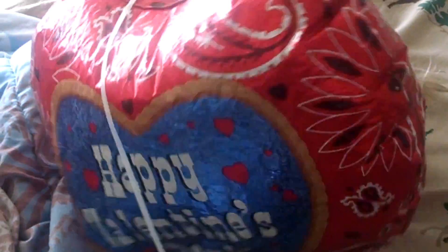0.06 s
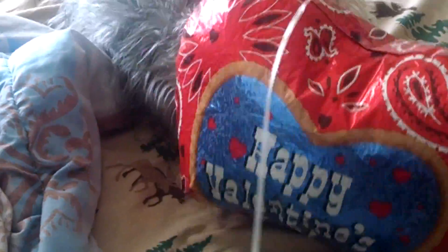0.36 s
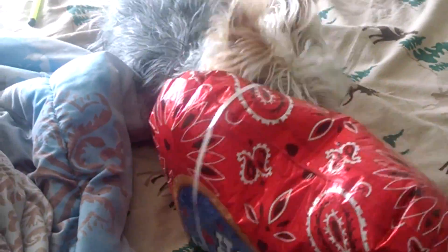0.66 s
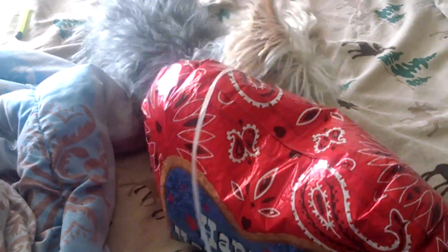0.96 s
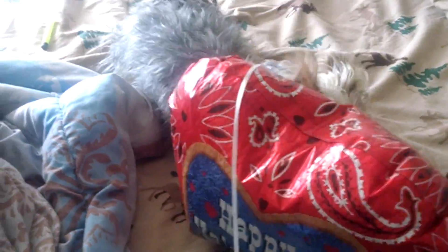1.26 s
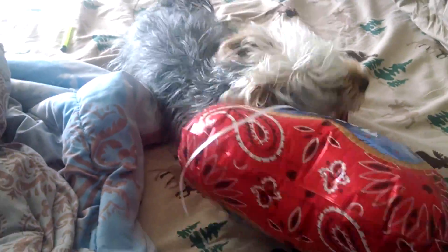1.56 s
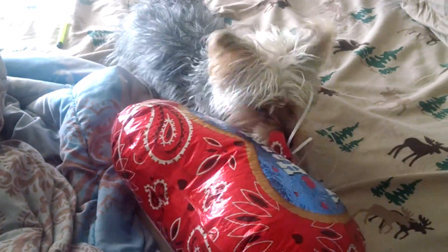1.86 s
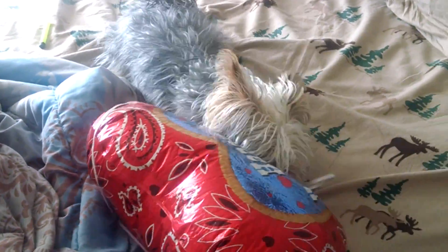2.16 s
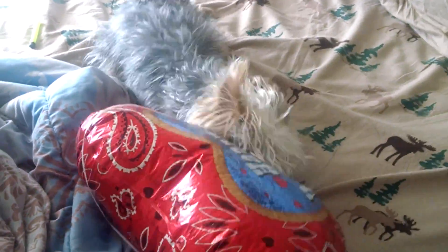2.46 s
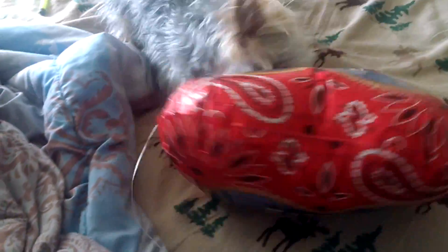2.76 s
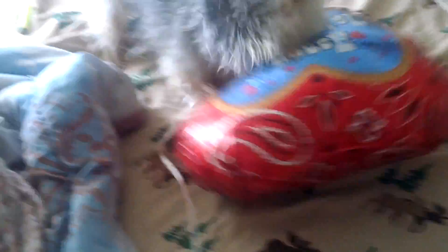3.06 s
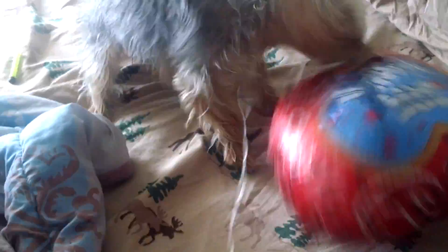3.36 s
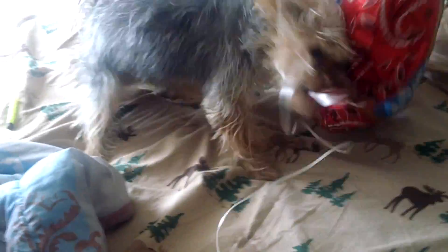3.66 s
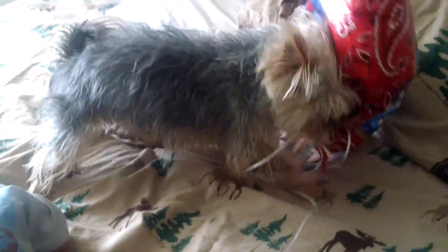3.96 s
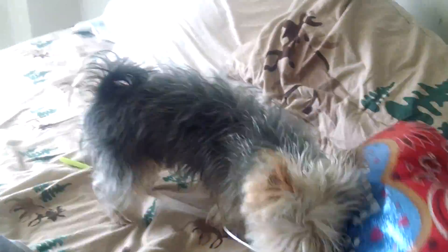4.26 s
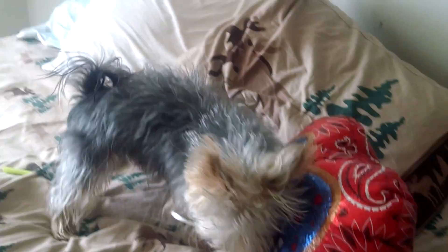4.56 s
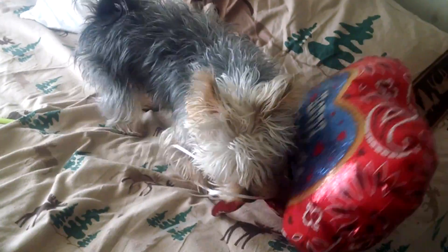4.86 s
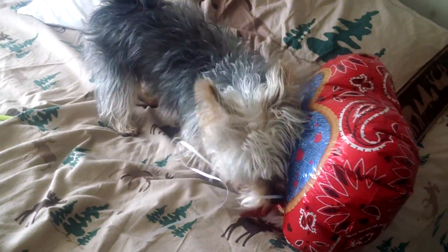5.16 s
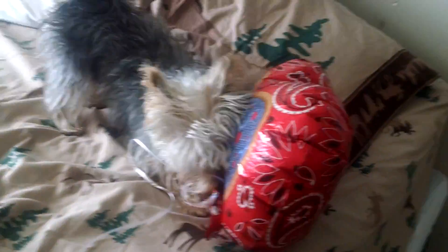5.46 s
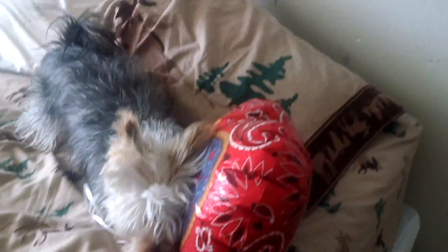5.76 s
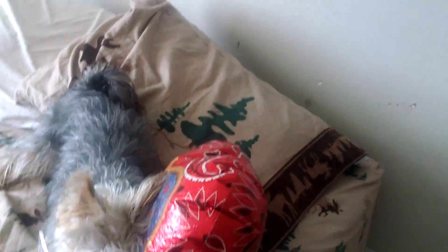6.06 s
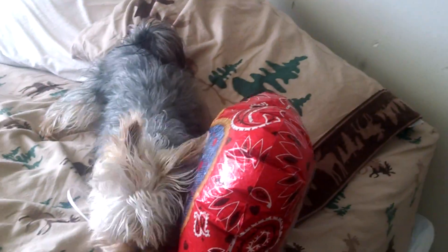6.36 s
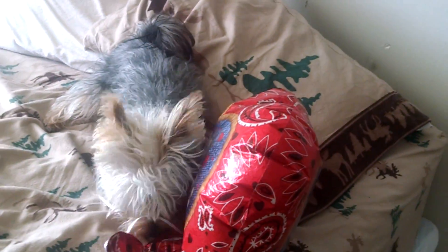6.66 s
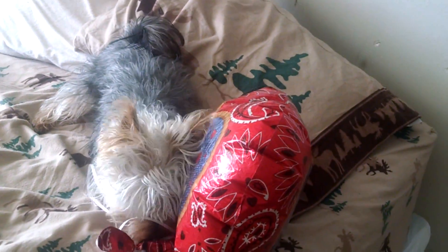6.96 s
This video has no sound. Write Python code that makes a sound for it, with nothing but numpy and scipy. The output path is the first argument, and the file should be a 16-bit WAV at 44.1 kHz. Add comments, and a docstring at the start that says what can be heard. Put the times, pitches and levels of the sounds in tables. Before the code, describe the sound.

A small dog bites and paws at a foil balloon on a bed, making bright, dense bursts of crinkling with sharp single cracks. The skin rubs on fur and bedding and booms softly inside. About halfway, hollow knocks, soft paw thuds and a brief squeak come, then the crinkling turns lighter, with a few more knocks near the end. The stereo microphone is close, in a faintly humming bedroom.

```python
"""A bedroom with a faint hum, the stereo microphone close above the bed.
A small dog bites and paws at a foil balloon: creases snap in dense swarms, the skin rubs on fur
and bedding with a brief squeak or two, and the gas inside booms softly.
Now and then a single crease cracks, the balloon takes a hollow knock or a paw thuds on the mattress."""
import sys
import numpy as np
from scipy import signal
from scipy.fft import rfft, irfft, next_fast_len
from scipy.io import wavfile

SR = 44100
rng = np.random.default_rng(int(sys.argv[2]) if len(sys.argv) > 2 else 0)


def to_wav(s):
    """Save 16-bit WAV."""
    ch = np.atleast_2d(s).T  # columns
    pcm = np.round(np.clip(ch, -1, 1) * 32767)  # PCM
    wavfile.write(sys.argv[1], SR, pcm.astype(np.int16))


N = 313110
TIME = np.arange(N) / SR

# Levels are relative within each table.
# spectra of the room tone, rubbed skin, booming gas, knocks, cracks and foil: frequency_hz, level_db
ROOM_COLOUR = [(50, -22), (100, -3), (300, -2), (1000, -17), (4000, -38)]
SKIN_COLOUR = [(150, -7.5), (400, 1), (700, 3.5), (1100, -5), (1800, -5.5), (2600, -4.5), (4500, -10.5),
               (9000, -22.5), (15000, -46)]
GAS_COLOUR = [(25, -17), (60, 1), (110, -7), (180, -2), (400, -7.5), (700, -17.5), (1500, -13), (7000, -28)]
KNOCK_COLOUR = [(40, -12), (140, -5), (240, 13.5), (400, 6.5), (900, 7.5), (2000, 7.5), (5000, 4),
                (15000, -31)]
CRACK_COLOUR = [(2000, -24), (7000, -9.5), (10000, -2), (14000, 1), (16000, -14)]
FOIL_COLOUR = [(400, -10.5), (1500, -10), (2500, -9.5), (4000, -5), (7000, -6.5), (10000, -1), (14000, 2.5),
               (15300, -4), (16000, -40)]
# swell of the deepest room hum: time_s, level_db
DEEP_HUM_SWELL = [(3.8, -63.5), (4.7, -53), (4.97, -47), (5.15, -58)]
# fainter tones in the room: pitch_hz, level_db
FAINT_HUMS = [(75, -61), (151, -67)]
# paws landing on the mattress: start_s, level_db, pitch_hz
PAW_STEPS = [(3.192, -22, 113), (3.319, -24.5, 120), (3.49, -22, 107)]
# resonances of the gas-filled skin: pitch_hz, width_hz, level_db
BALLOON_MODES = [(151.9, 8.9, 2.5), (202.1, 8.1, 2.5), (252, 38, -2), (301, 20, 1), (360.5, 20, 1),
                 (458.6, 80, 2), (594, 87, -2.5), (730, 64, -0.5)]
# the balloon pushed about: time_s, gas_db, skin_db
PUSHES = [(0, -29.5, -38), (0.2, -27.5, -34), (0.45, -37, -72), (0.8, -38.5, -50), (1.21, -32.5, -41.5),
          (1.55, -29.5, -66), (1.75, -39, -33.5), (1.95, -32.5, -42.5), (2.7, -31.5, -36),
          (3.25, -40.5, -32.5), (3.58, -34, -28), (3.78, -46.5, -42.5), (4.1, -43, -51), (4.4, -39, -46),
          (5.3, -31, -34.5), (6.2, -28, -36.5), (6.45, -37, -43.5), (6.93, -30.5, -40)]
# brief squeaks of the skin: centre_s, length_s, pitch_hz, level_db
SQUEAKS = [(0.324, 0.059, 590, -30), (0.62, 0.065, 890, -44), (3.556, 0.061, 612, -33)]
# knocks on the balloon: start_s, shudder_db, decay_s, dull_above_hz, boom_db, boom_hz
KNOCKS = [ (3.3238, -17.5, .04, 6000, -6.5, 600), (3.3345, -28.5, .2, 1500, -21, 620),
          (3.4014, -24, .05, 1800, -9.5, 296), (3.490, -23, 0.07, 2500, -19, 594),
          (5.4772, -23.5, 0.04, 3000, -14, 400), (5.4805, -26.5, 0.5, 2200, -29, 765),
          (6.1652, -17, .2, 1300, -11.5, 243), (6.1816, -19.5, .22, 1100, -13.5, 243),
          (6.2146, -24, .62, 900, -20, 243), ]
# single creases cracking: start_s, level_db
CRACKS = [(0.2437, -17), (0.2617, -12), (0.5483, -12.5), (1.6798, -16), (2.0805, -14), (2.4235, -15),
          (3.3265, -12), (3.5967, -14), (4.1803, -28), (4.2628, -26), (4.2824, -27), (4.7983, -31.5),
          (4.9683, -20), (5.229, -22), (5.4788, -17), (5.8773, -20.5), (6.0154, -21), (6.1748, -20),
          (6.2714, -14.5), (6.3131, -22), (6.3522, -11), (6.4006, -24), (6.456, -33), (6.5622, -27),
          (6.5797, -29), (6.764, -30.5), (6.7891, -30.5), (6.8175, -31), (6.9002, -28), (6.9177, -31)]
# light rustle between scrunches: time_s, level_db
RUSTLE = [(0, -32), (1.1, -38.5), (3.5, -49), (4.05, -51.5), (4.8, -41.5), (5.8, -38.5), (6.3, -39),
          (6.45, -47), (7.1, -47)]
# each bite, tug or shake scrunches the foil: peak_s, level_db, swell_s, fade_s
SCRUNCHES = [ (0.09, -29, 0.072, 0.046), (0.221, -18.5, 0.05, 0.026), (0.274, -22, 0.016, 0.072),
             (0.362, -15.5, 0.052, 0.064), (0.47, -28, 0.065, 0.046), (0.555, -31.5, 0.046, 0.098),
             (0.72, -33.5, 0.11, 0.11), (1.042, -33, 0.016, 0.054), (1.27, -29.5, 0.036, 0.14),
             (1.55, -18, 0.11, 0.11), (1.566, -14.5, .014, 0.016), (1.702, -22, 0.091, 0.16),
             (2.116, -21.5, 0.1, 0.14), (2.403, -20, 0.12, 0.091), (2.6, -22.5, 0.065, 0.074),
             (2.679, -18, 0.071, 0.055), (2.812, -18.5, 0.06, 0.079), (2.885, -16, 0.038, 0.032),
             (2.955, -17.5, 0.063, 0.068), (3.129, -15.5, 0.084, 0.012), (3.239, -25, 0.27, 0.045),
             (3.327, -16, 0.016, 0.014), (3.345, -21.5, 0.057, 0.079), (3.402, -20.5, 0.0079, 0.01),
             (3.48, -22.5, 0.032, 0.15), (3.496, -14.5, 0.0061, 0.014), (3.579, -24, 0.21, 0.2),
             (3.599, -16, .006, 0.0045), (3.77, -30, 0.07, 0.1), (3.88, -36, 0.037, 0.069),
             (4.17, -40, 0.087, 0.22), (4.29, -35.5, 0.033, 0.037), (4.37, -29, 0.072, 0.11),
             (4.655, -27.5, 0.045, 0.049), (4.961, -26.5, 0.056, 0.15), (5.18, -33, 0.13, 0.14),
             (5.47, -32, 0.12, 0.076), (5.89, -30, 0.071, 0.1), (6.02, -33, 0.043, 0.11),
             (6.175, -32, 0.037, 0.12), (6.345, -33, 0.037, 0.065), (6.565, -40, .05, .04),
             (6.89, -42, 0.088, .06)]
# the microphone's left port against its right one: frequency_hz, gain_db
LEFT_PORT = [(40, -8), (200, -4.5), (600, -2.5), (1300, -3), (4700, -5.5), (7000, 2), (9500, -9.5),
             (11000, -9)]
# the part of its sound that the left port shares with the right: frequency_hz, share_db
PORT_SHARE = [(100, -8), (600, -3.5), (1200, -11), (2200, -80)]
# stereo widening, how much of the opposite port is taken away: frequency_hz, gain_db
WIDENING = [(350, -22), (1100, -3), (2200, -.4), (3200, -.5), (4800, -3), (7500, -6.5), (11000, -1.8)]

DEEP_HUM_HZ = 49
SQUEEZE_SHARE, SQUEEZES_PER_S = .02, 4   # pitch bend as a share of the pitch, and its rate
SCRUNCH_RUB_DB, RUB_EXPONENT = -18, .78   # skin drag at a full-scale scrunch; under 1 it swings less
THUMP_SHARE = .27   # length of a knock's thump against its shudder
RING_CYCLES, RING_DB = 85, -14   # the ring after a thump: cycles to die away, level against the thump
SWELL_SHAPE, FADE_SHAPE = 1.6, 1.49   # 1 gives a scrunch a pointed top, more a rounder one
SCRUNCH_FALL_DB = 11.5   # drop one swell time before the peak, or one fade time after it
FOLDS_PER_S, FOLD_DECAY_S, FOLD_DB = 110, .0008, -10   # larger folds; level against the fine snaps
PORT_LAG_S, CUTOFF_HZ = 17.2 / SR, 16450
FFT_SIZE = next_fast_len(N, real=True)
BIN_HZ = np.maximum(np.arange(FFT_SIZE // 2 + 1) * SR / FFT_SIZE, 1)


def from_db(db):
    """Decibels to gain."""
    return 10 ** (np.asarray(db) / 20)


def rms_one(x):
    """Scale to unit power."""
    return x / np.sqrt(np.mean(x ** 2) + 1e-20)


def in_time(rows):
    """Each column of a timed table at every sample."""
    times, *columns = np.transpose(rows)
    return [np.interp(TIME, times, column) for column in columns]


def bin_gains(points):
    """Gain of a spectrum table at every FFT bin, interpolated over log frequency."""
    hz, db = np.transpose(points)
    return from_db(np.interp(np.log(BIN_HZ), np.log(hz), db))


def drift(rate):
    """A random wander that turns about rate times a second; rms 1."""
    knots = rng.standard_normal(N // 20)
    return rms_one(np.interp(TIME * rate, np.arange(len(knots)), knots))


def butter(x, hz, kind, order=2):
    """Causal low- or high-pass."""
    return signal.sosfilt(signal.butter(order, hz, kind, fs=SR, output="sos"), x + 1e-18)


def burst(start, t60, rise):
    """Envelope of one contact: a quick rise, then a fall of 60 dB in t60 seconds."""
    envelope, first = np.zeros(N), int(start * SR)
    age = TIME[:min(N - first, SR // 2)]
    envelope[first:first + len(age)] = (1 - np.exp(-age / rise)) * from_db(-60 * age / t60)
    return envelope


def at_ports(near, far, colour):
    """Two noises coloured at the microphone: its ports share bass; the left faces away from the treble."""
    right = rfft(near, FFT_SIZE)
    shared = np.clip(bin_gains(PORT_SHARE), 0, 1)
    left = bin_gains(LEFT_PORT) * (shared * right + np.sqrt(1 - shared ** 2) * rfft(far, FFT_SIZE))
    return irfft(np.array([left, right]) * rms_one(bin_gains(colour)), FFT_SIZE)[:, :N]


def snaps(per_s):
    """Random tiny clicks of random size; even power at any rate."""
    chance = np.clip(per_s / SR, 1e-4, 1)
    return rms_one(rng.standard_normal(N) * (rng.random(N) < chance) / np.sqrt(chance))


def swarm(colour, per_s, clump_db, clump_rate):
    """Snaps that come in clumps as folds run across the foil; rms 1."""
    clumps = from_db(clump_db * drift(clump_rate))
    return rms_one(at_ports(snaps(per_s) * clumps, snaps(per_s) * clumps, colour))


def bedroom():
    """Low room tone and a wavering hum, right of centre, whose deepest note swells once."""
    noise = at_ports(*rng.standard_normal((2, N)), ROOM_COLOUR)
    hum = 0
    for hz, db in [(DEEP_HUM_HZ, *in_time(DEEP_HUM_SWELL)), *FAINT_HUMS]:
        amplitude = np.sqrt(2) * from_db(db + 2 * drift(5.3))
        hum = hum + amplitude * np.sin(2 * np.pi * hz * TIME + drift(6))
    return from_db(-48.5) * noise + hum * from_db([[-4], [1.5]])


def mattress():
    """Each paw sets the mattress wobbling for a few cycles, right of centre."""
    thuds = sum(from_db(db) * burst(start, t60=.086, rise=.011) * np.sin(2 * np.pi * hz * (TIME - start))
                for start, db, hz in PAW_STEPS)
    return thuds * from_db([[-4], [3]])


def balloon(x, through_db):
    """The balloon's resonances ring in parallel beside the sound that passes straight through."""
    out = from_db(through_db) * x
    for hz, width, db in BALLOON_MODES:
        radius = np.exp(-np.pi * width / SR)
        feedforward = np.array([1, 0, -1]) * (1 - radius ** 2) / 2
        feedback = [1, -2 * radius * np.cos(2 * np.pi * hz / SR), radius ** 2]
        out = out + from_db(db) * signal.lfilter(feedforward, feedback, x + 1e-18)
    return out


def squeezed(x):
    """The booming rises and sinks in pitch at random as the dog presses and lets go."""
    clock = np.cumsum(1 + SQUEEZE_SHARE * drift(SQUEEZES_PER_S)) % N
    return np.array([np.interp(clock, np.arange(N), port) for port in x])


def rubbing(scrunch):
    """The skin sticks and slips on fur and bedding, more with each scrunch; the gas inside booms."""
    gas_db, skin_db = in_time(PUSHES)
    slip = np.hypot(from_db(skin_db), from_db(SCRUNCH_RUB_DB) * scrunch ** RUB_EXPONENT)
    skin = slip * swarm(SKIN_COLOUR, per_s=3500, clump_db=1.5, clump_rate=90)
    drive = swarm(GAS_COLOUR, per_s=2500, clump_db=.7, clump_rate=40)
    gas = rms_one(squeezed(balloon(drive, through_db=-13.5)))
    return skin + from_db(gas_db) * gas


def squeaks():
    """For a moment the slipping turns nearly regular and the skin sounds a rough note."""
    unsteady_time = np.cumsum(1 + .05 * drift(220)) / SR
    notes = 0
    for centre, length, hz, db in SQUEAKS:
        envelope = from_db(db) * np.exp(-(2 * (TIME - centre) / length) ** 2)
        notes = notes + envelope * np.sin(2 * np.pi * hz * unsteady_time)
    return notes * from_db(3 + 1.5 * drift(150))


def knocks():
    """A paw or the muzzle bumps the balloon: the skin shudders, the gas gives a thump that rings on."""
    force, boom = 0, 0
    for start, shudder_db, t60, dull_hz, boom_db, boom_hz in KNOCKS:
        contact = burst(start, t60, rise=.001) * rng.standard_normal((2, N))
        force = force + from_db(shudder_db) * butter(contact, dull_hz, "low", order=1)
        thump = burst(start, THUMP_SHARE * t60, rise=.0003)
        ring = from_db(RING_DB) * burst(start, RING_CYCLES / boom_hz, rise=.0003)
        boom = boom + from_db(boom_db) * (thump + ring) * np.sin(2 * np.pi * boom_hz * (TIME - start))
    shudder = from_db(7.5) * balloon(at_ports(*force, KNOCK_COLOUR), through_db=-4)
    return shudder + butter(boom, 150, "high") * from_db([[-2], [1]])


def cracks():
    """A stiff crease flips in about a millisecond; the bedroom answers faintly."""
    flips = sum(from_db(db + 12) * burst(start, t60=.0035, rise=.0002) for start, db in CRACKS)
    tails = sum(from_db(db - 18) * burst(start, t60=.09, rise=.002) for start, db in CRACKS)
    return at_ports(*((flips + tails) * rng.standard_normal((2, N))), CRACK_COLOUR)


def scrunching():
    """How hard the dog crumples the foil: every scrunch swells to its peak and fades."""
    coarse_time, power = TIME[::20], 0
    for peak, db, swell, fade in SCRUNCHES:
        before = np.clip((peak - coarse_time) / swell, 0, 8) ** SWELL_SHAPE
        after = np.clip((coarse_time - peak) / fade, 0, 8) ** FADE_SHAPE
        power = power + from_db(db - SCRUNCH_FALL_DB * (before + after)) ** 2
    return np.interp(TIME, coarse_time, np.sqrt(power))


def crinkle(scrunch):
    """The foil up close: harder crumpling snaps more creases; larger folds give way in short crackles."""
    rustle_db, = in_time(RUSTLE)
    level_db = 20 * np.log10(np.hypot(scrunch, from_db(rustle_db)))
    per_s = 13000 * from_db(.2 * (level_db + 30))   # 13000 snaps a second at -30 dB
    fine = swarm(FOIL_COLOUR, per_s, clump_db=.3, clump_rate=300)
    fold_onsets = (rng.random(N) < FOLDS_PER_S / SR) * rng.random(N)
    folds = signal.lfilter([1], [1, -np.exp(-1 / (FOLD_DECAY_S * SR))], fold_onsets + 1e-18)
    crackles = rms_one(at_ports(*(folds * rng.standard_normal((2, N))), FOIL_COLOUR))
    return from_db(level_db) * (fine + from_db(FOLD_DB) * crackles)


def scene():
    """Everything heard from close above the bed."""
    scrunch = scrunching()
    return crinkle(scrunch) + rubbing(scrunch) + squeaks() + cracks() + knocks() + mattress() + bedroom()


def record(dry):
    """The microphone widens the image: each channel subtracts the opposite port a moment later."""
    ports, cross = rfft(dry, FFT_SIZE), bin_gains(WIDENING)
    opposite = np.exp(-2j * np.pi * BIN_HZ * PORT_LAG_S) * ports[::-1]
    wide = irfft((ports - cross * opposite) / np.sqrt(1 + cross ** 2), FFT_SIZE)[:, :N]
    rounded = wide / (1 + (wide / .8) ** 6) ** (1 / 6)   # peaks round off towards 0.8
    top_cut = signal.cheby2(18, 60, CUTOFF_HZ, fs=SR, output="sos")
    return signal.sosfilt(top_cut, rounded)


dry = scene()
out = record(dry)
to_wav(out)
```